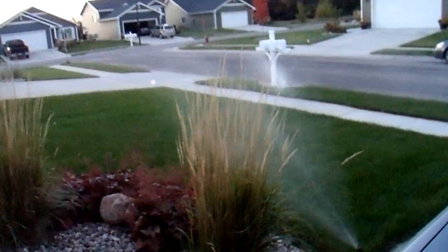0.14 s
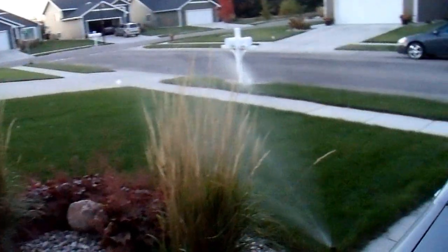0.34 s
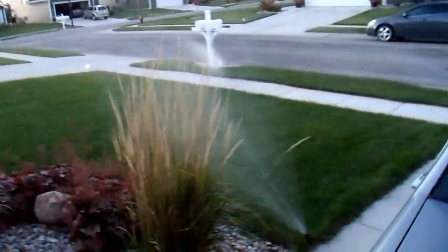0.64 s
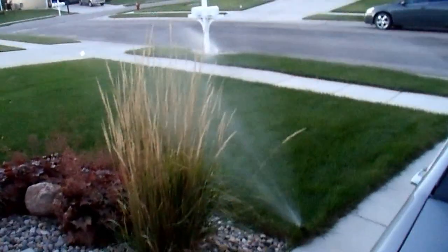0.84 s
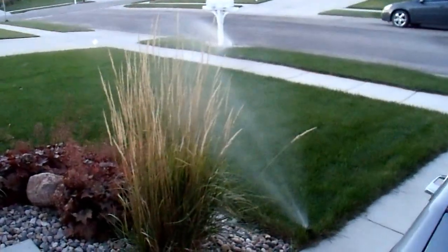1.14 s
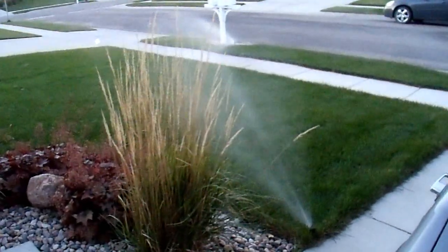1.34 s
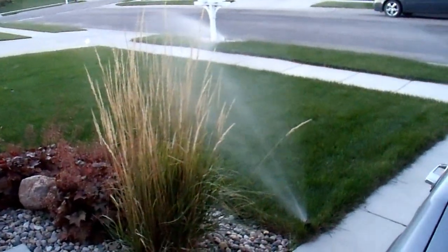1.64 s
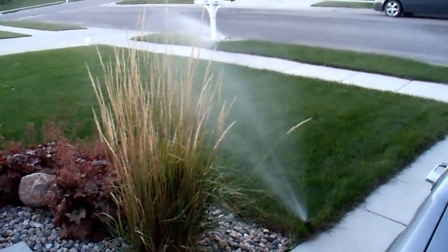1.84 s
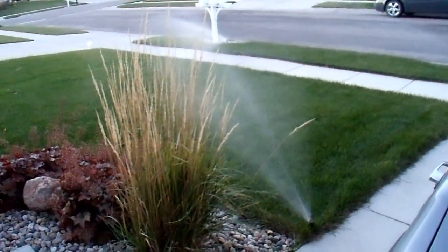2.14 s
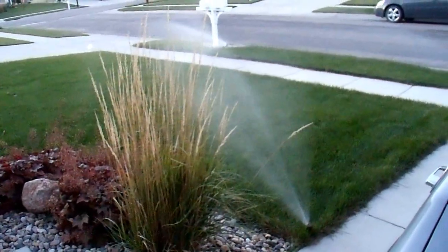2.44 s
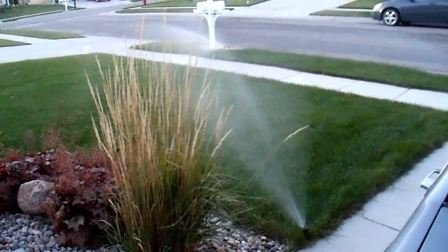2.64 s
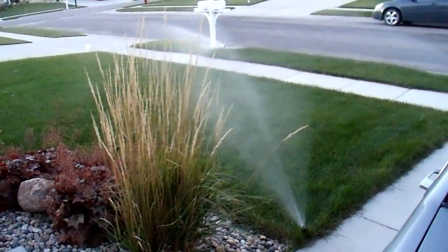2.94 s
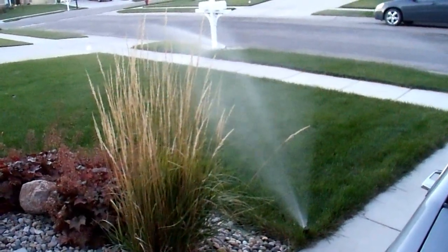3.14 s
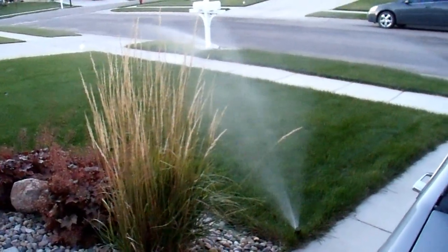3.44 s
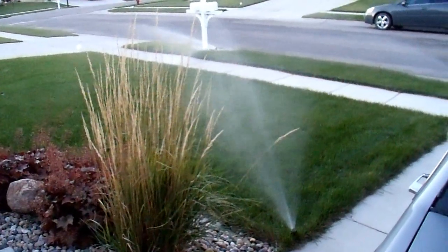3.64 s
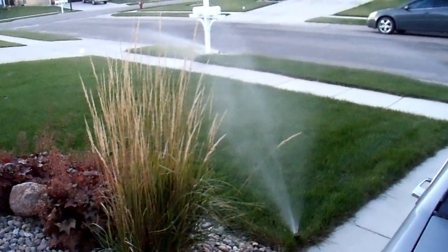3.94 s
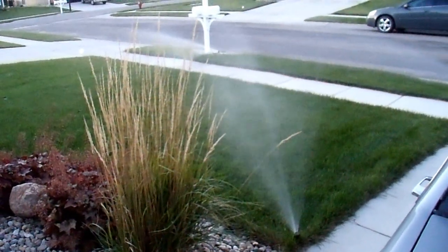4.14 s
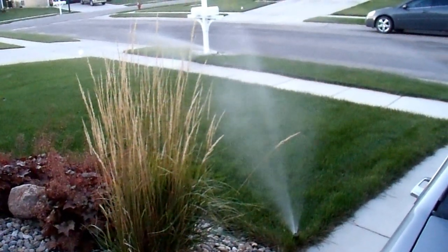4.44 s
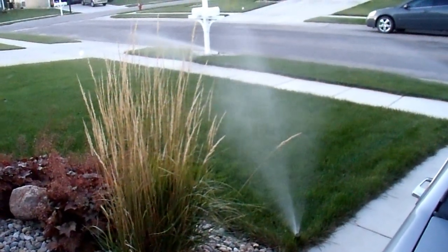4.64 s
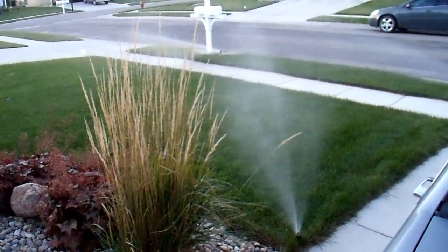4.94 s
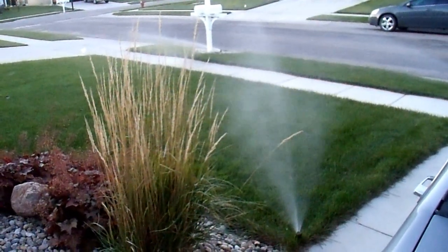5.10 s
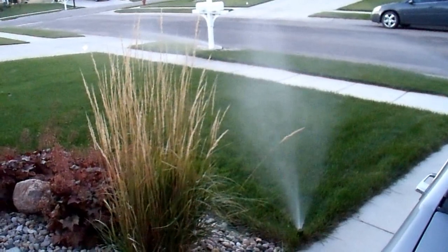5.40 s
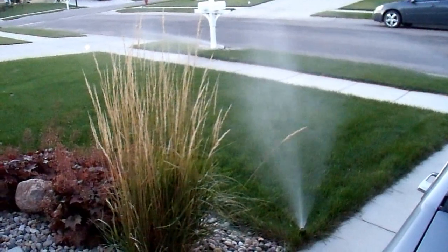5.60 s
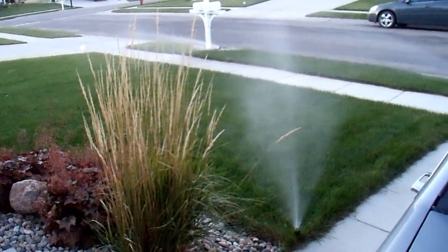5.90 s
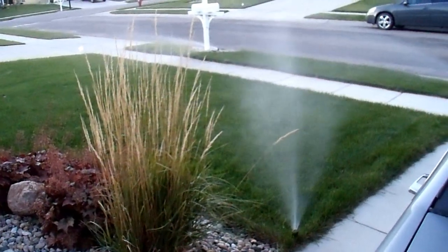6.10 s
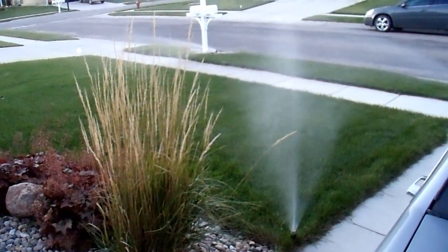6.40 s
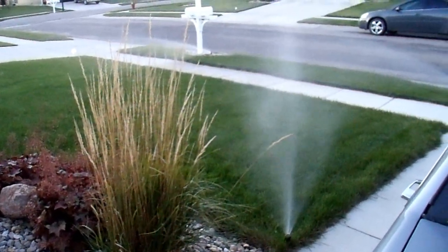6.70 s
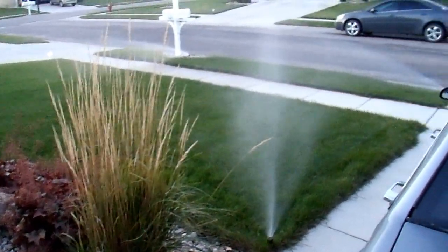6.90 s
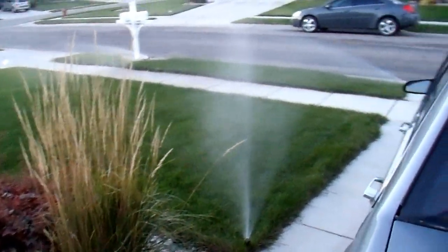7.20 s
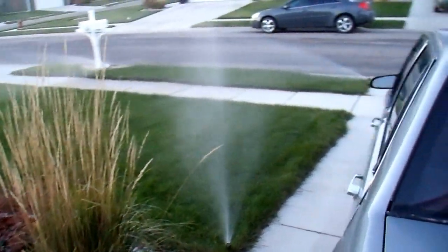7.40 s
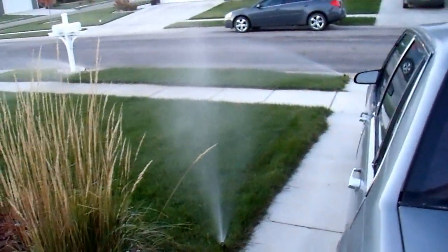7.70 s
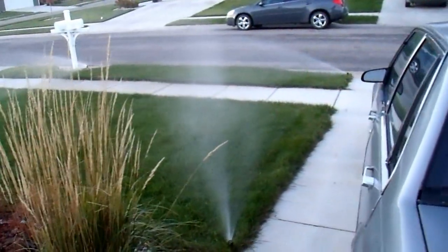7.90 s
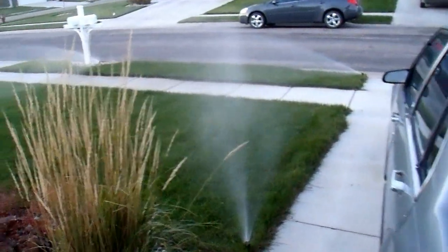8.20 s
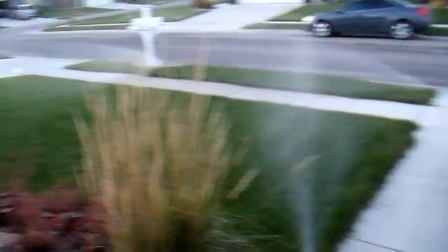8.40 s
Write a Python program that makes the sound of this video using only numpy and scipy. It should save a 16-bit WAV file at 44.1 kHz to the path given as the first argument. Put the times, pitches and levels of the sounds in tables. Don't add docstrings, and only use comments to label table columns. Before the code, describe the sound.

Compressed air pushes water from a sprinkler in two hissing surges with sharp popping slugs, after faint camera whirs and ticks, ending in a spitting drop-off.

```python
import sys
import numpy as np
from scipy import signal
from scipy.fft import rfft, irfft, next_fast_len
from scipy.io import wavfile
from scipy.ndimage import uniform_filter1d

SR = 44100
rng = np.random.default_rng(int(sys.argv[2]) if len(sys.argv) > 2 else 0)


def magnitude_from_level(level_db):
    exponent = np.asarray(level_db, float) / 20
    return 10 ** exponent


def wrap_up_sound(samples):
    columns = np.atleast_2d(samples).T
    tamed = np.clip(columns, -1, 1)
    steps = np.round(tamed * 32767).astype(np.int16)
    wavfile.write(sys.argv[1], SR, steps)


N = 377055

# start_s, peak_db
BIG_SLUGS = [(.3853, -23), (.591, -20), (.9356, -17), (1.0653, -22), (1.2078, -17.5), (1.3144, -16),
             (1.3489, -18.5), (1.8078, -11), (1.9242, -5.5), (1.9599, -3), (1.9756, -2.5), (2.0872, -5),
             (2.1205, -6.5), (2.3, -11), (2.482, -7), (2.5258, -9), (2.6505, -7.5), (2.6958, -6),
             (2.856, -11), (3.0104, -5.5), (3.081, -5.5), (3.4403, -11.5), (3.689, -8.5), (3.7724, -12.5),
             (3.9944, -9.5), (4.112, -12), (4.387, -12), (8.2205, -0.5), (8.336, -3), (8.398, -7)]
# time_s, jet_level_db (air pressure), water_share (crackling part, 0-1)
NOZZLE_FLOW = [(0.0, -51.5, .7), (1.55, -44, .6), (1.68, -33, 0.6), (1.87, -28.5, 0), (2.0, -25.5, 0.5),
               (2.3, -24.5, .45), (2.69, -31, 0.44), (2.99, -28, 0.5), (3.3, -32, 0.7), (3.92, -37.5, 0.5),
               (4.15, -35, 0.6), (4.44, -29, 0.7), (4.52, -23.5, 0.67), (4.8, -18.5, 0.58),
               (7.71, -17, 0.68), (8.19, -21.5, 0.97), (8.29, -27.5, .35), (8.55, -27.5, .35)]


def evened(x):
    return x / np.sqrt(np.mean(x ** 2) + 1e-20)


def curves(rows):
    times_s, *columns = np.transpose(rows)
    return [np.interp(np.arange(N) / SR, times_s, column) for column in columns]


def fade(span_s, edge_s=0.088):
    t = np.arange(N) / SR
    start_s, end_s = span_s
    rise = np.clip((t - start_s) / edge_s, 0, 1) if start_s > 0 else 1
    fall = np.clip((end_s - t) / edge_s, 0, 1) if end_s < N / SR - .01 else 1
    return rise * fall


def colour(x, points, extra=np.ones_like):
    hz = abs(np.fft.fftfreq(4096, 1 / SR))
    point_hz, point_db = np.transpose(points)
    gain_db = np.interp(np.log(hz + 1), np.log(point_hz), point_db)
    log_gain = np.log(magnitude_from_level(gain_db) * extra(hz) + 1e-5)
    taps = np.fft.ifft(np.exp(np.conj(signal.hilbert(log_gain)))).real
    return signal.oaconvolve(x, taps)[:N]


def chance(lo_hz, hi_hz):
    size = next_fast_len(N)
    hz = np.fft.rfftfreq(size, 1 / SR) + .1
    shape = 1 / np.sqrt(hz * (1 + (lo_hz / hz) ** 4) * (1 + (hz / hi_hz) ** 4))
    return evened(irfft(rfft(rng.standard_normal(size)) * shape, size)[:N])


def nozzle():
    gulp_from_s, gulp_every_s, gulp_db, gulp_dying_s = 8.29, 0.066, 2.8, 0.27
    choke_db, choke_s = -3, 0.011
    jet_db, water_share = curves(NOZZLE_FLOW)
    t = np.arange(N) / SR
    late = np.maximum(t - gulp_from_s, 0)
    gulps = -np.sin(2 * np.pi * late / gulp_every_s) * np.exp(-late / gulp_dying_s)
    burst_s = np.array([row[0] for row in BIG_SLUGS] + [N])
    wait_s = burst_s[np.searchsorted(burst_s, t)] - t
    choke = np.exp(-(wait_s / choke_s) ** 2)
    return jet_db + gulp_db * gulps + choke_db * choke, np.clip(water_share, 0, 1)


def spits():
    # start_s, peak_db
    last_drops = [
        (8.2389, -3),
        (8.2482, -5),
        (8.2666, -8),
        (8.293, -14),
        (8.318, -12),
        (8.4056, -4),
        (8.423, -7),
        (8.4602, -13),
        (8.497, -8),
        (8.5251, -12),
    ]
    slugs_per_s, mist_db = 34, -24
    top_db, db_per_jet_db, spread_db = -12.5, 0.48, 12
    t, train = np.arange(500) / SR, np.zeros(N + 500)
    small_s, smaller = rng.random((round(slugs_per_s * N / SR), 2)).T
    small_s = .01 + small_s * (N / SR - .02)
    under_db = curves(NOZZLE_FLOW)[0][(small_s * SR).astype(int)] - mist_db
    small_db = np.where(under_db < 0, top_db + db_per_jet_db * under_db - spread_db * smaller, -120)
    rows = BIG_SLUGS + last_drops + list(zip(small_s, small_db))
    for (start_s, peak_db), noise in zip(rows, rng.standard_normal((len(rows), len(t)))):
        burst = 0.097 * noise * np.exp(-t / 0.0041)
        burst[:3] += np.sign(noise[0]) * np.array([.5, .25, -.45])
        train[round(start_s * SR) - 8:][:len(t)] += magnitude_from_level(peak_db) * burst
    return train[:N]


def droplets(per_s, size_db, length_ms):
    t, out = np.arange(40), np.zeros(N + 40)
    at = np.flatnonzero(rng.random(N) < per_s / SR)
    draws = rng.standard_normal((N // 8, len(t) + 2))[:len(at)]
    spread = (draws[:, :2] ** 2).sum(1) / 2
    size = magnitude_from_level(size_db * np.minimum(spread, 2.5))
    cracks = draws[:, 2:] * np.exp(-t * 1000 / SR / length_ms)
    cracks *= (size / np.linalg.norm(cracks, axis=1))[:, None]
    np.add.at(out, at[:len(draws), None] + t, cracks)
    return out[:N]


def echoes_gain(echoes, hz, split_hz=7200):
    low, high = (sum(g * np.cos(2 * np.pi * hz * ms / 1000) for ms, g in taps) for taps in echoes)
    upper = 1 / (1 + (split_hz / (hz + 1)) ** 16)
    return np.exp((1 - upper) * low + upper * high)


def jet(span_s, spectrum, echoes, slugs, spit_db, cracks_per_s, size_db, clump_db, sputter_db, level_db,
        lower_db):
    jet_db, water_share = nozzle()
    is_open = fade(span_s)
    cracks = droplets(cracks_per_s * is_open * magnitude_from_level(clump_db * chance(15, 250)), size_db, 0.14)
    cracks /= np.sqrt(np.mean(cracks ** 2) / np.mean(is_open))
    hiss = evened(rng.standard_normal(N) * magnitude_from_level(sputter_db * chance(12, 800)))
    flow = np.sqrt(1 - water_share) * hiss + np.sqrt(water_share) * cracks
    flow += slugs * is_open * magnitude_from_level(spit_db - jet_db)
    heard = colour(flow, spectrum, lambda hz: echoes_gain(echoes, hz))
    lower = signal.oaconvolve(heard, signal.firwin(41, 7200, fs=SR), "same")
    upper = heard - lower
    steady = 1.53 * np.median(abs(upper[is_open > .5]))
    balanced = (upper + magnitude_from_level(lower_db) * lower) / steady
    return np.sqrt(fade(span_s, 0.22)) * magnitude_from_level(jet_db + level_db) * balanced


def yard():
    # pitch_hz, level_db (per Hz)
    far_colour = [(1060, -33.5), (1800, -12.5), (1990, -8), (2990, -6), (3240, -3), (4830, -3.5),
                  (6280, -7), (8540, -5.5), (9270, -3.5), (9960, -11), (11000, -2), (11900, -7),
                  (13300, -8), (15700, -13)]
    # pitch_hz, level_db (per Hz)
    street_colour = [(12, -2), (40, -20.5), (200, -10), (400, -10.5), (470, -3), (750, -1), (1390, -6.5),
                     (2100, -4), (3000, -7.5), (5000, -39)]
    far_level_db, far_start_db, far_fill_s, street_db = -39, -3.5, 0.75, -51
    far_db = far_level_db + far_start_db * np.exp(-np.arange(N) / SR / far_fill_s)
    far_hiss = evened(colour(rng.standard_normal(N), far_colour))
    far = magnitude_from_level(far_db + .5 * chance(4.5, 200)) * far_hiss
    street = evened(colour(rng.standard_normal(N), street_colour))
    return far + magnitude_from_level(street_db + 0.37 * chance(0.23, 40)) * street


def compressor():
    # start_s, level_db (tone from then on)
    load_steps = [
        (0, -84),
        (1.07, -70),
        (1.88, -65),
        (2.6, -64),
        (7.62, -71),
    ]
    # start_s, end_s, level_db
    strained = [
        (1.9, 3.05, -72.5),
        (5.198, 5.806, -73.5),
    ]
    hum_hz, strain_hz, load_s = 77.4, 189, 0.19
    t = np.arange(N) / SR
    step_s, step_db = np.transpose(load_steps)
    stepped_db = step_db[np.searchsorted(step_s, t, "right") - 1]
    tone_db = uniform_filter1d(stepped_db, round(load_s * SR), mode="nearest")
    strain = sum(magnitude_from_level(db) * fade((start_s, end_s), load_s) for start_s, end_s, db in strained)
    hum = magnitude_from_level(tone_db) * np.sin(2 * np.pi * hum_hz * t)
    return np.sqrt(2) * (hum + strain * np.sin(2 * np.pi * strain_hz * t))


def grip():
    # start_s, peak_db, pitch_hz
    thuds = [
        (.002, -60, 50),
        (.075, -64, 45),
        (.115, -63, 50),
        (.335, -63, 50),
        (.5, -64, 50),
        (.53, -65, 45),
        (1.312, -55, 200),
    ]
    cycles = 1.5
    out = np.zeros(N)
    for start_s, peak_db, thud_hz in thuds:
        turns = np.arange(0, cycles, thud_hz / SR)
        thud = np.sin(np.pi * turns / cycles) ** 2 * np.sin(2 * np.pi * turns)
        out[round(start_s * SR):][:len(turns)] += magnitude_from_level(peak_db) * thud
    return out


def zoom_motor():
    # start_s, end_s, level_db
    bursts = [
        (0.16, 0.207, -55.5),
        (0.25, 0.322, -55.5),
        (0.36, .395, -54),
        (.405, .46, -53),
        (0.47, 0.498, -62),
        (0.818, .85, -53),
        (1.17, 1.193, -64),
    ]
    # multiple (of the step rate), level_db
    overtones = [(3, -11), (4, 0.5), (5, -17), (6, -5), (8, -10)]
    step_hz = 535
    t = np.arange(N) / SR
    running = sum(magnitude_from_level(db + 5.5) * np.clip(np.minimum(t - start_s, end_s - t) / .004, 0, 1)
                  for start_s, end_s, db in bursts)
    phase = 2 * np.pi * np.cumsum(step_hz * (1 + .0015 * chance(5.4, 60))) / SR
    whine = sum(magnitude_from_level(db) * np.sin(k * phase) for k, db in overtones)
    return running * magnitude_from_level(1.3 * chance(30, 200)) * whine


def finger_ticks():
    # start_s, peak_db, ring_hz, low_share (of the low body, 0-1)
    ticks = [
        (.0155, -28, 4300, 0),
        (0.044, -40, 900, 0.6),
        (.1335, -30, 4530, 0),
        (0.154, -33, 3100, .05),
        (0.1611, -24.5, 2580, 0.26),
        (.1705, -30, 4130, 0),
        (0.365, -30, 4200, 0.15),
        (.4915, -34, 2500, 0),
        (1.3165, -25, 2580, 0.15),
    ]
    # pitch_hz, level_db, decay_s (to 60 dB down)
    body_tones = [(1020, 1.5, .03), (600, -5, .03), (250, -24, .04), (2050, 1.5, .012)]
    out = np.zeros(N)
    t = np.arange(1500) / SR
    rise = np.clip(t / 0.00044, 0, 1)
    low = sum(magnitude_from_level(db - 60 * t / decay_s) * np.sin(2 * np.pi * hz * t) for hz, db, decay_s in body_tones)
    band = signal.butter(2, [1700, 3400], "band", fs=SR)
    snap = magnitude_from_level(-60 * t / .012) * evened(signal.lfilter(*band, rng.standard_normal(len(t))))
    for start_s, peak_db, ring_hz, low_share in ticks:
        ring = magnitude_from_level(-60 * t / 0.0081) * np.sin(2 * np.pi * ring_hz * t)
        tick = rise * (ring + low_share * low + 0.34 * snap)
        out[round(start_s * SR):][:len(t)] += magnitude_from_level(peak_db - 1.5) * tick
    return out


def car_spray():
    # time_s, level_db
    spray = [
        (6.9, -39),
        (7.3, -36.5),
        (7.7, -36),
        (8.2, -35.5),
        (8.55, -31),
    ]
    # pitch_hz, level_db (per Hz)
    patter_colour = [(710, -57), (1200, -22.5), (1980, -14.5), (2470, -7.5), (3710, -1.5), (4330, 1.5),
                     (5290, 0), (6220, -4.5), (7000, -6), (9100, -41), (15400, -120)]
    # pitch_hz, level_db (per Hz)
    panel_colour = [(53, -33), (90, 3), (151, -9), (269, 4.5), (446, -5), (565, 2), (804, 1), (1210, -6),
                    (1500, -5), (1950, -38), (3300, -120)]
    drum_start_db, drum_per_spray_db, drum_build_s = -54.5, .4, 0.38
    spray_db, span_s = curves(spray)[0], (spray[0][0], spray[-1][0])
    paint_drops = rng.standard_normal(N) * magnitude_from_level(1.5 * chance(22.6, 900))
    panel_drops = rng.standard_normal(N) * magnitude_from_level(1.2 * chance(2.54, 60))
    patter = magnitude_from_level(spray_db + 3.0) * evened(colour(paint_drops, patter_colour))
    drum_db = drum_start_db + drum_per_spray_db * (spray_db - spray_db[0])
    drum = magnitude_from_level(drum_db) * fade(span_s, drum_build_s) * evened(colour(panel_drops, panel_colour))
    return fade(span_s, 0.39) * (patter + drum)


def scene():
    # pitch_hz, level_db (per Hz)
    wet_colour = [(1760, -47), (3000, -24.5), (3370, -18.5), (4330, -16.5), (5110, -10), (5870, -11.5),
                  (7370, -6.5), (8290, -5), (10100, 0), (11000, 3), (12800, -3), (15100, -14), (15700, -5)]
    dry_colour = [(880, -58), (1500, -42), (2140, -27), (2870, -23), (3520, -17), (4250, -15.5),
                  (5120, -10.5), (6290, -9), (8440, -1), (10200, 0), (11300, 2.5), (12500, 0.5),
                  (13300, -6), (15700, -13)]
    turned_colour = [(1470, -40.5), (2500, -24), (3560, -14), (4690, -10), (5070, -7), (6140, -7.5),
                     (6940, -5.5), (7550, -1.5), (8220, -1), (9150, 1), (10800, 5.5), (12100, 3.5),
                     (15700, -14.5)]
    # delay_ms, gain (signed)
    wet_echoes = [
        [(0.384, 0.11), (0.588, 0.16), (1.18, 0.06), (3.024, 0.06), (3.254, 0.1), (3.76, 0.09), (4.198, -0.08), (5.114, 0.06)],
        [(0.356, 0.17), (0.532, 0.09), (0.682, -0.05), (0.788, -0.13), (3.228, 0.08), (3.664, -0.06), (3.928, -0.05), (4.072, -0.06)],
    ]
    dry_echoes = [
        [(0.284, -0.15), (0.576, 0.31), (0.96, -0.07), (1.648, -0.09), (2.194, 0.06), (2.782, -0.06), (3.166, -0.14), (3.412, -0.16), (3.798, 0.1), (4.064, -0.09), (4.304, 0.1), (5.062, -0.08)],
        [(0.27, 0.06), (0.406, -0.17), (0.608, 0.25), (0.718, -0.07), (0.828, 0.1), (1.03, 0.08), (1.636, -0.06), (1.764, -0.05), (3.282, 0.1), (3.752, 0.06), (3.916, 0.11), (4.694, 0.05)],
    ]
    turned_echoes = [
        [(0.3, -0.13), (0.578, 0.21), (0.728, 0.11), (1.15, 0.04), (1.482, -0.05), (1.996, 0.04), (3.454, 0.05), (4.45, 0.04)],
        [(0.288, -0.05), (0.364, 0.13), (0.642, -0.15), (0.742, 0.16), (1.584, 0.04), (3.362, -0.04), (3.692, -0.04), (3.984, -0.05)],
    ]
    slugs = spits()
    wet = jet((0, 4.35), wet_colour, wet_echoes, slugs, spit_db=5.5, cracks_per_s=800, size_db=6.0,
              clump_db=5.5, sputter_db=2.0, level_db=0.17, lower_db=-0.3)
    drier = jet((4.15, 7.1), dry_colour, dry_echoes, slugs, spit_db=12.5, cracks_per_s=1500, size_db=4.0,
                clump_db=3, sputter_db=0.26, level_db=0.28, lower_db=2.1)
    turned = jet((6.9, 8.55), turned_colour, turned_echoes, slugs, spit_db=3.5, cracks_per_s=1400,
                 size_db=3.0, clump_db=2.0, sputter_db=-0.8, level_db=0.1, lower_db=0.1)
    sprinkler = wet + drier + turned
    handling = grip() + zoom_motor() + finger_ticks()
    return (sprinkler + yard() + compressor() + handling + car_spray())[None]


def roll_off(x):
    return signal.sosfilt(signal.butter(12, 15820, fs=SR, output="sos"), x)


def record(dry):
    soft = dry / (1 + (dry / .8) ** 4) ** .25
    treble_cut = signal.firwin(1023, 15740, window=("kaiser", 9), fs=SR)
    mix = signal.oaconvolve(soft, treble_cut[None], "same")
    return roll_off(mix)


dry = scene()
out = record(dry)
wrap_up_sound(out)
```